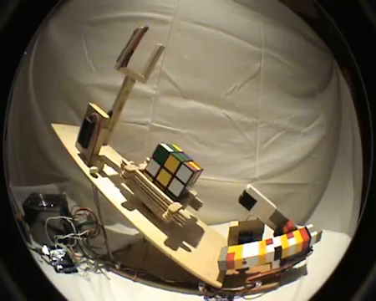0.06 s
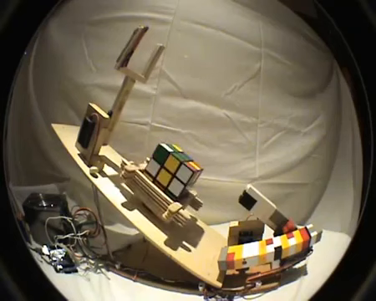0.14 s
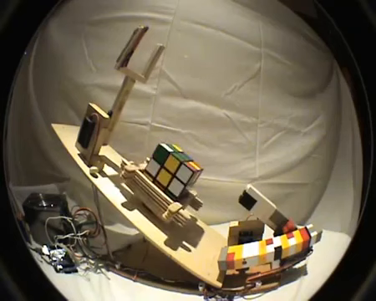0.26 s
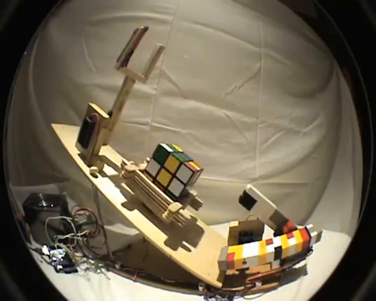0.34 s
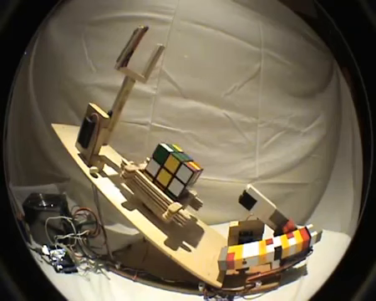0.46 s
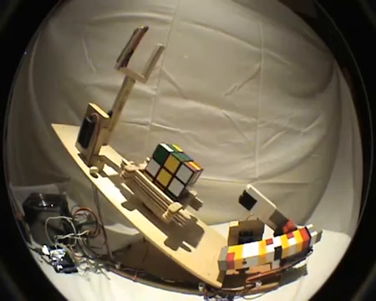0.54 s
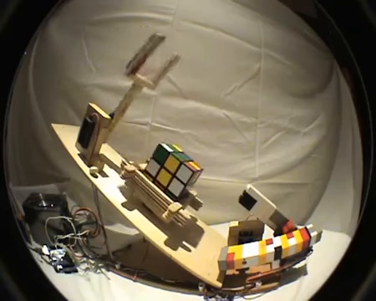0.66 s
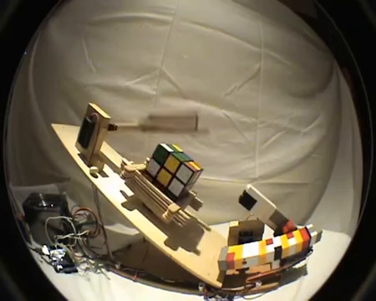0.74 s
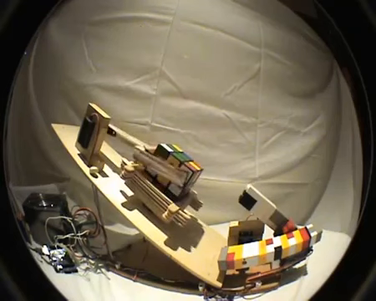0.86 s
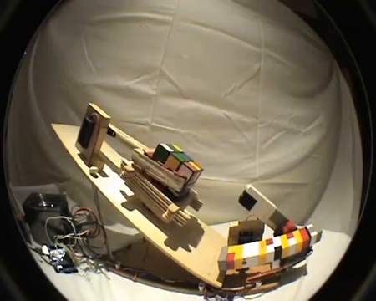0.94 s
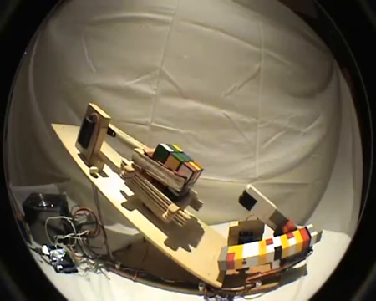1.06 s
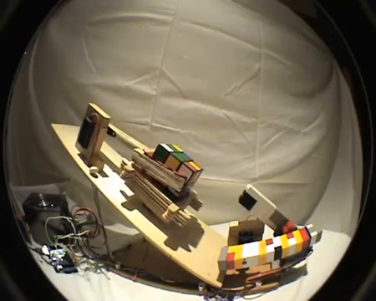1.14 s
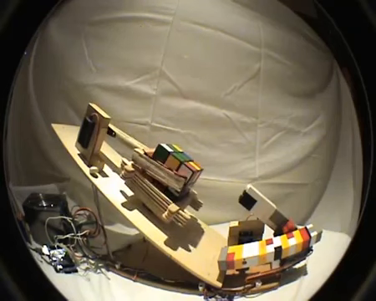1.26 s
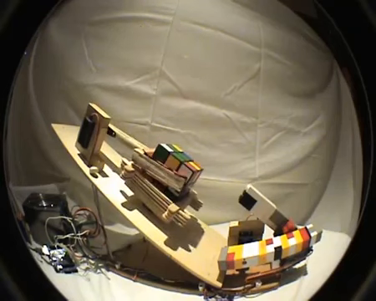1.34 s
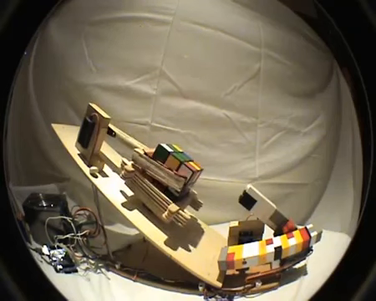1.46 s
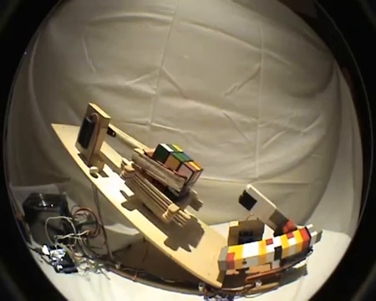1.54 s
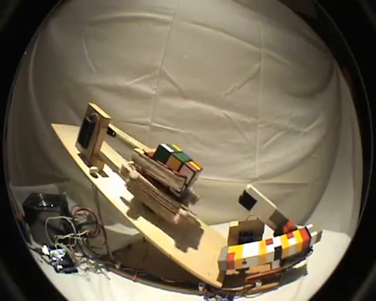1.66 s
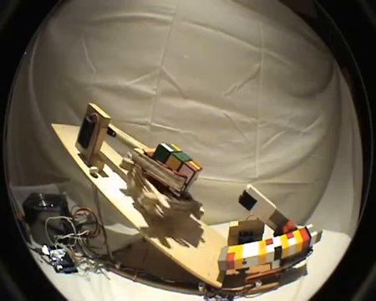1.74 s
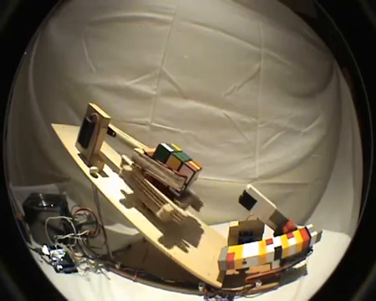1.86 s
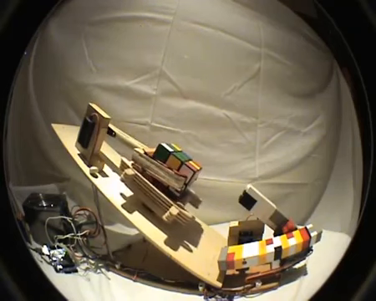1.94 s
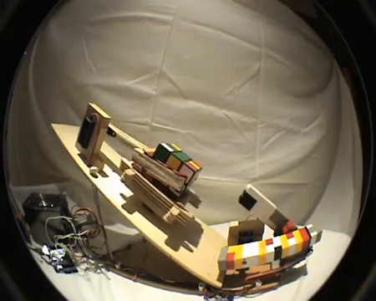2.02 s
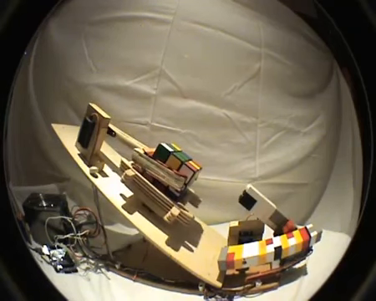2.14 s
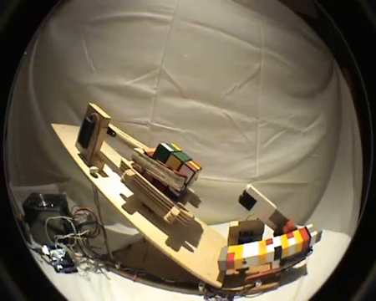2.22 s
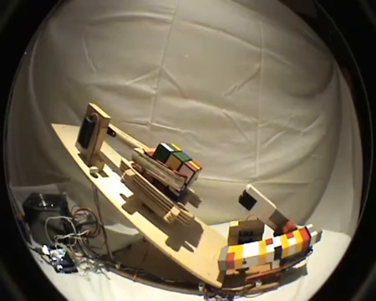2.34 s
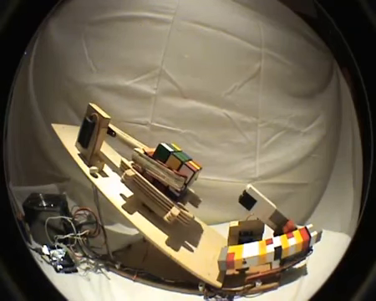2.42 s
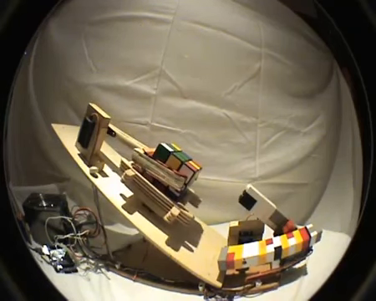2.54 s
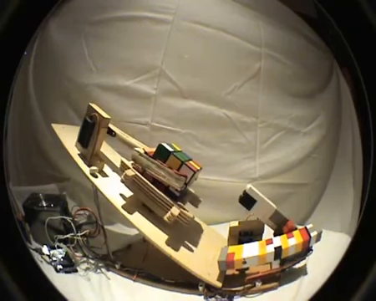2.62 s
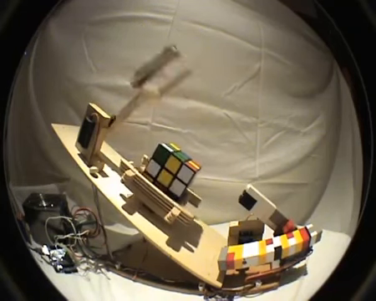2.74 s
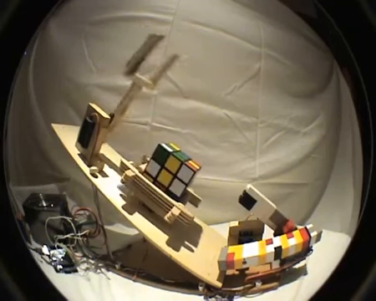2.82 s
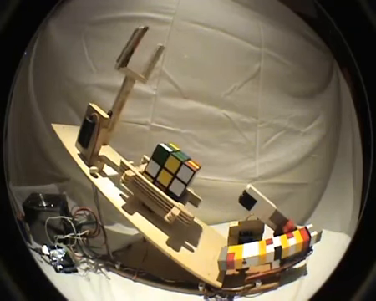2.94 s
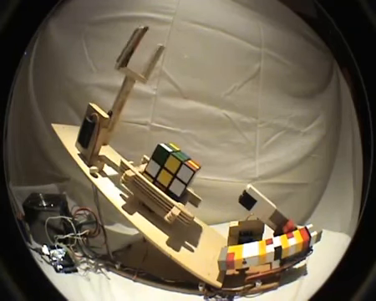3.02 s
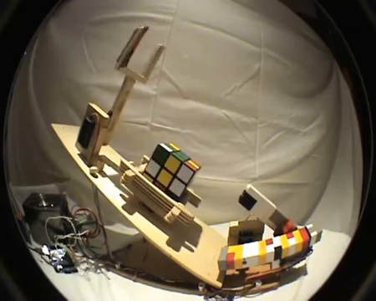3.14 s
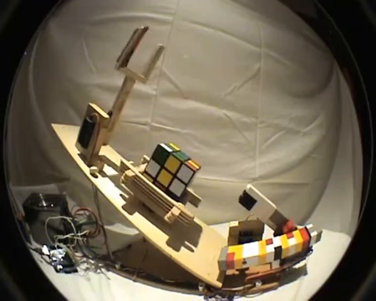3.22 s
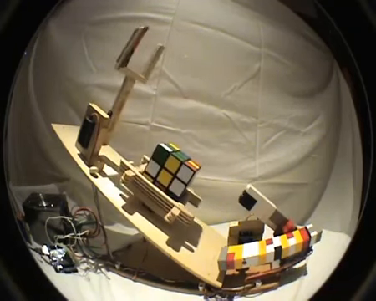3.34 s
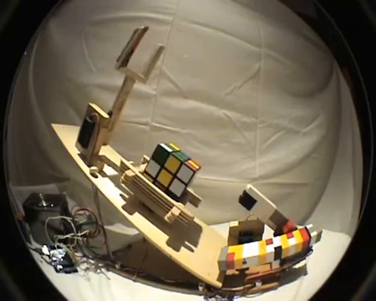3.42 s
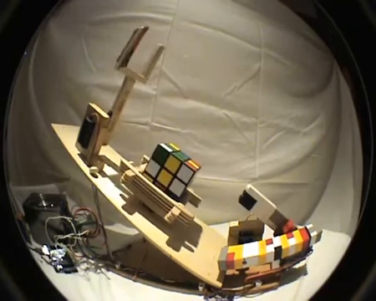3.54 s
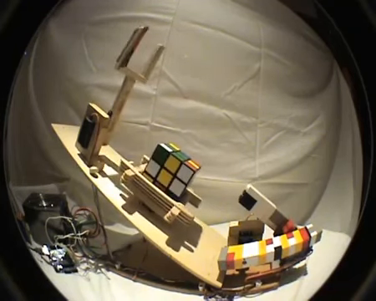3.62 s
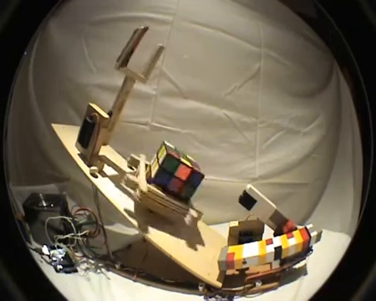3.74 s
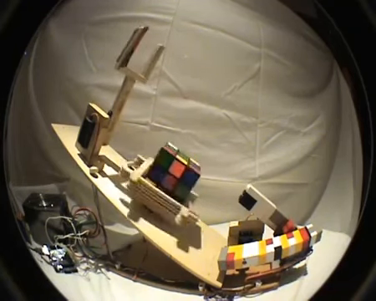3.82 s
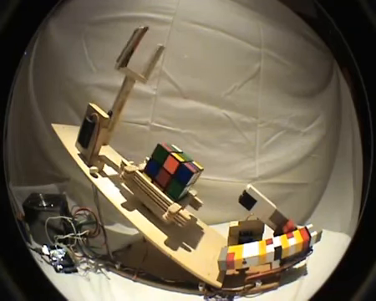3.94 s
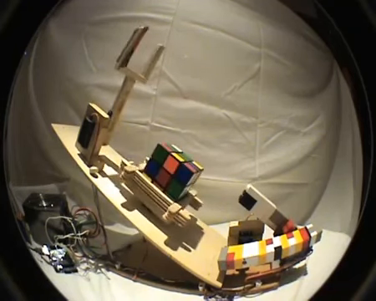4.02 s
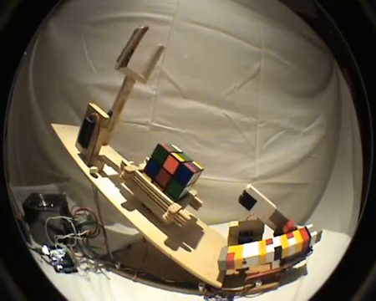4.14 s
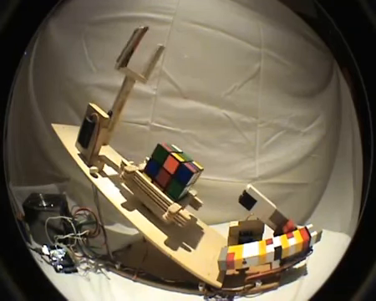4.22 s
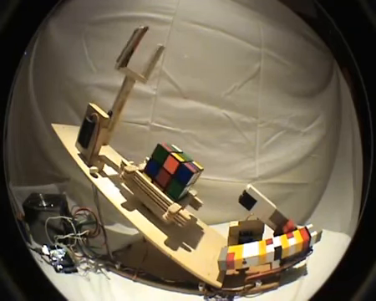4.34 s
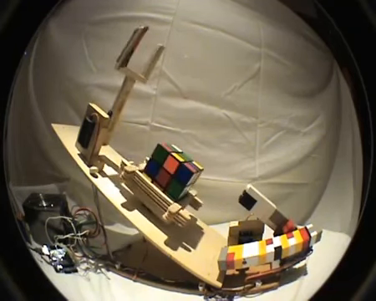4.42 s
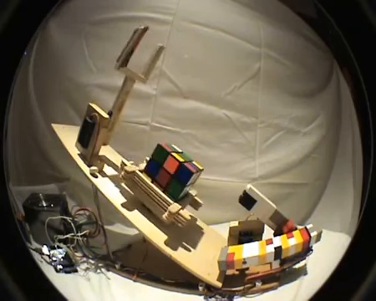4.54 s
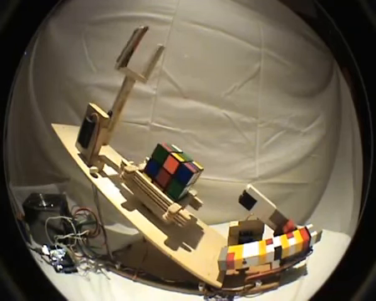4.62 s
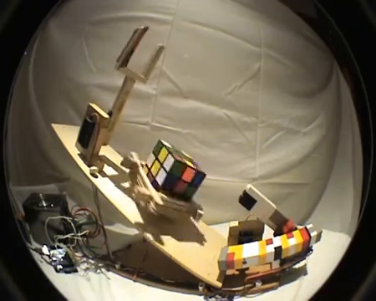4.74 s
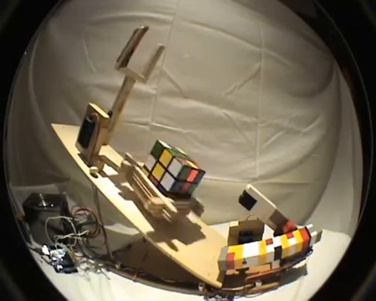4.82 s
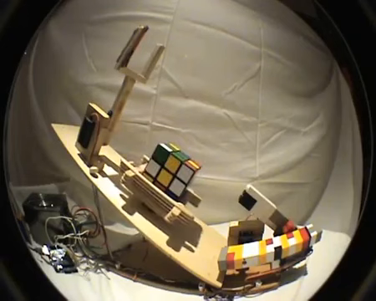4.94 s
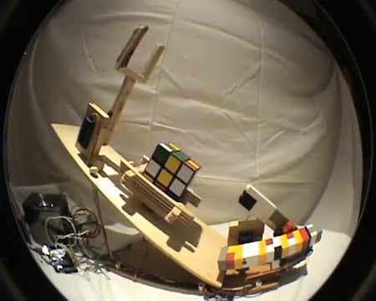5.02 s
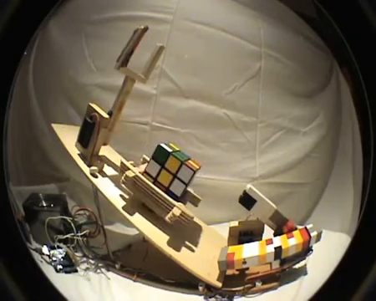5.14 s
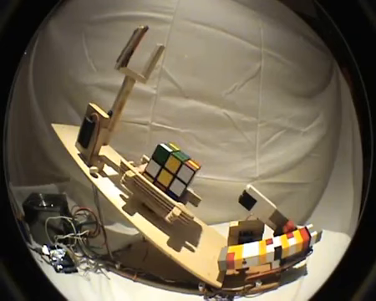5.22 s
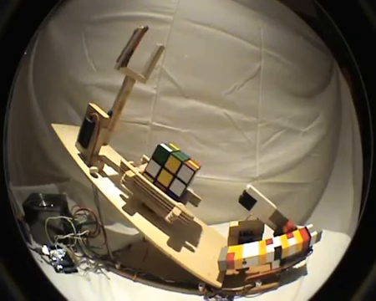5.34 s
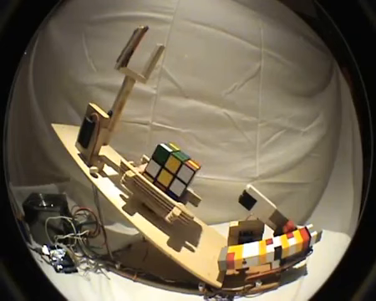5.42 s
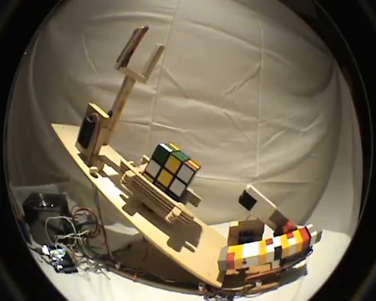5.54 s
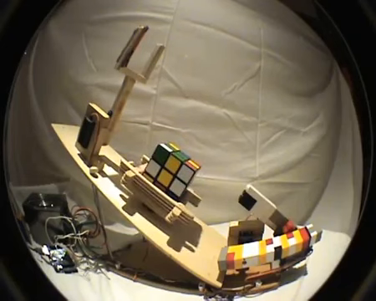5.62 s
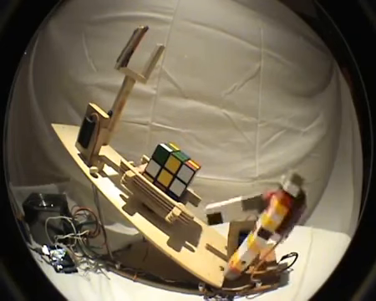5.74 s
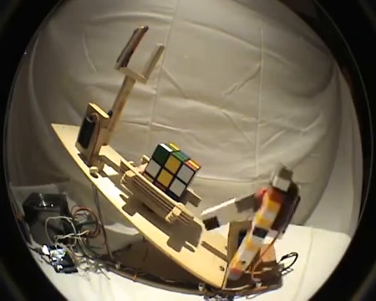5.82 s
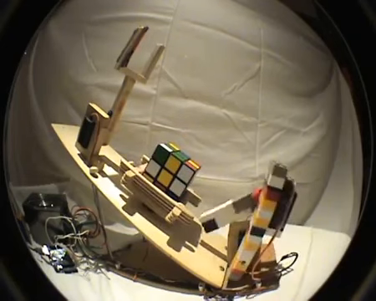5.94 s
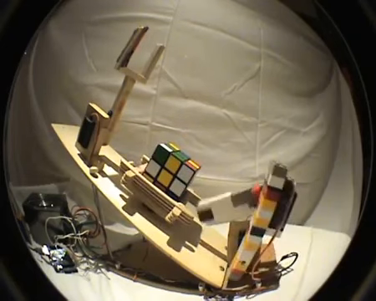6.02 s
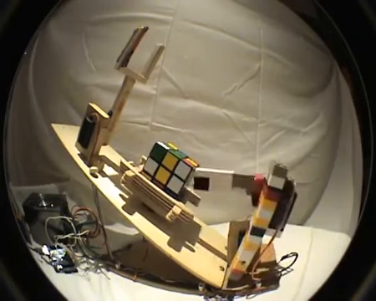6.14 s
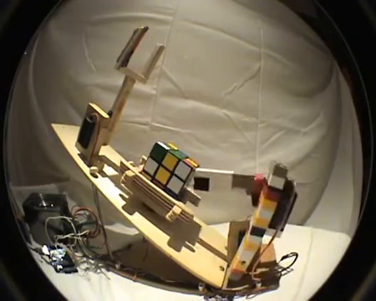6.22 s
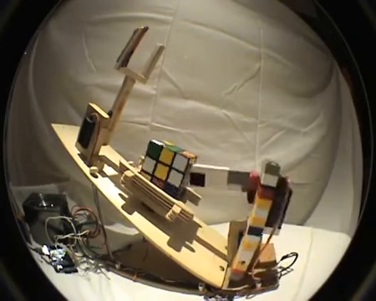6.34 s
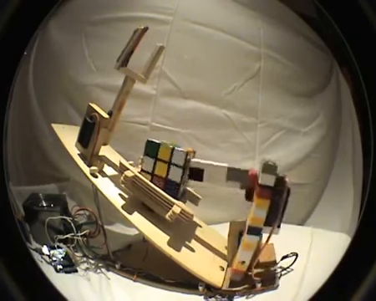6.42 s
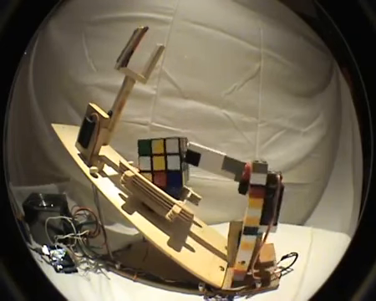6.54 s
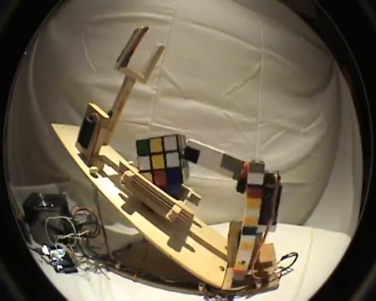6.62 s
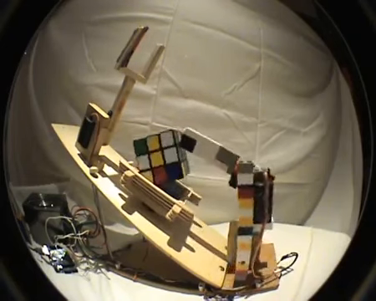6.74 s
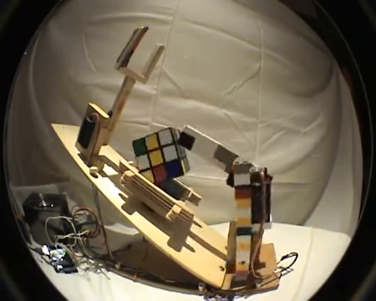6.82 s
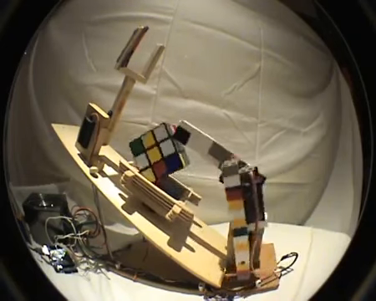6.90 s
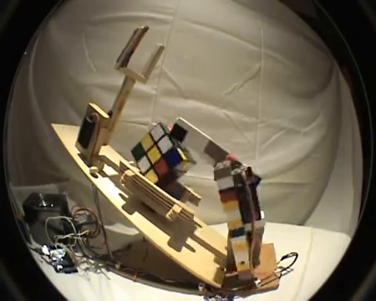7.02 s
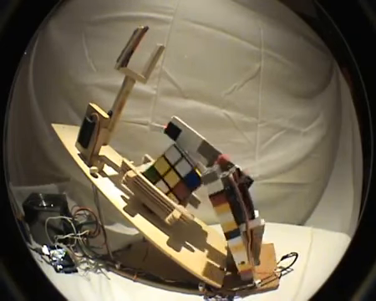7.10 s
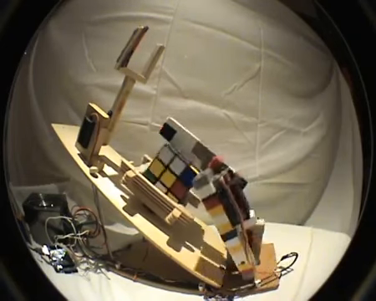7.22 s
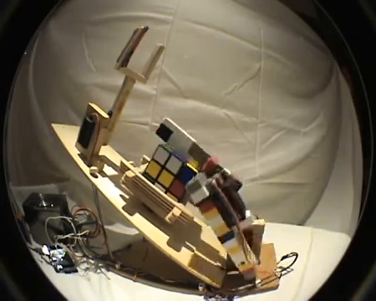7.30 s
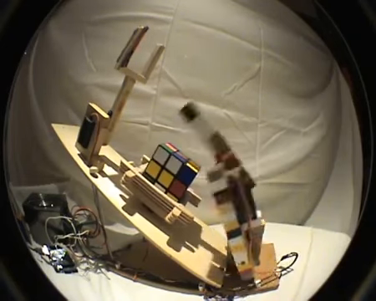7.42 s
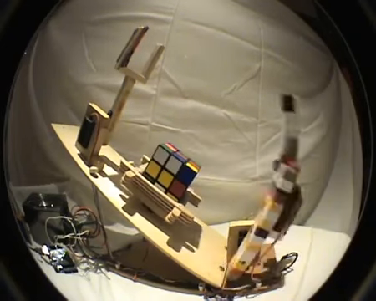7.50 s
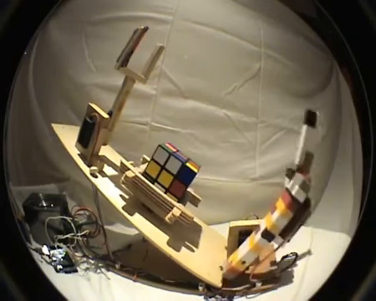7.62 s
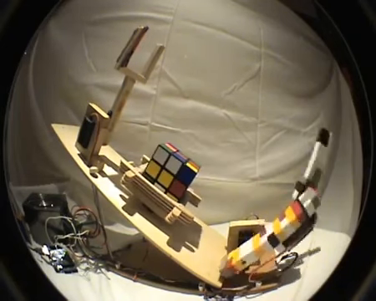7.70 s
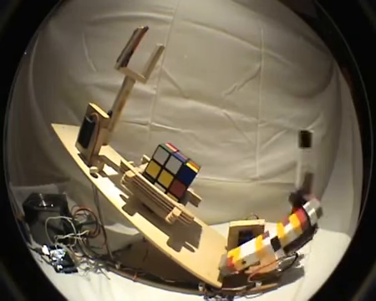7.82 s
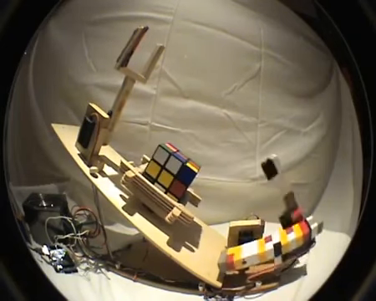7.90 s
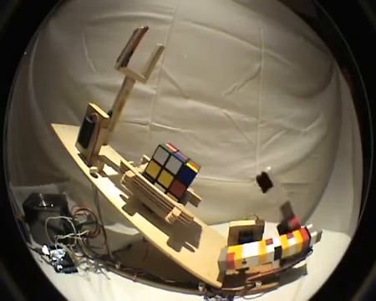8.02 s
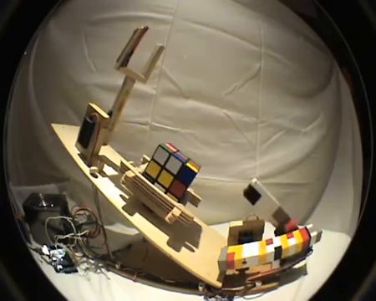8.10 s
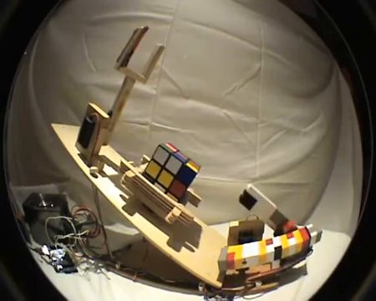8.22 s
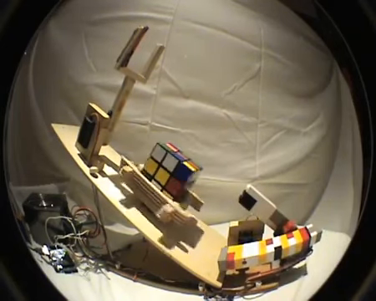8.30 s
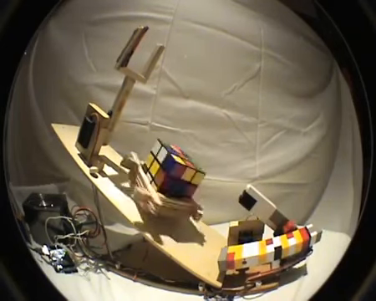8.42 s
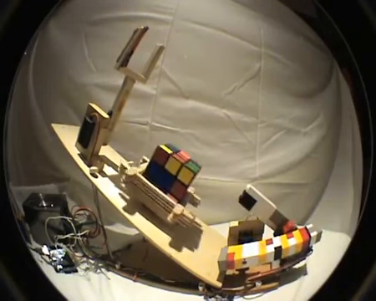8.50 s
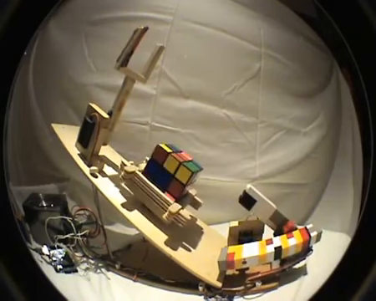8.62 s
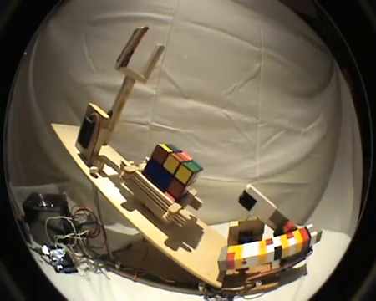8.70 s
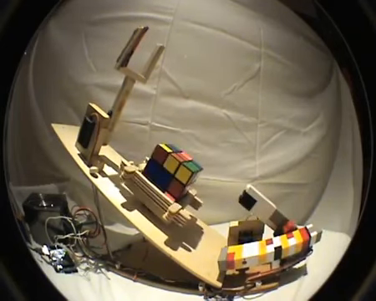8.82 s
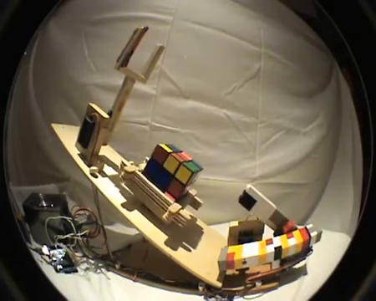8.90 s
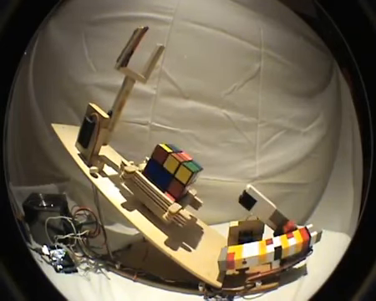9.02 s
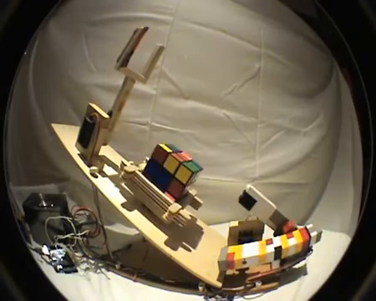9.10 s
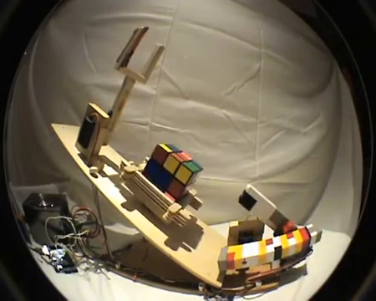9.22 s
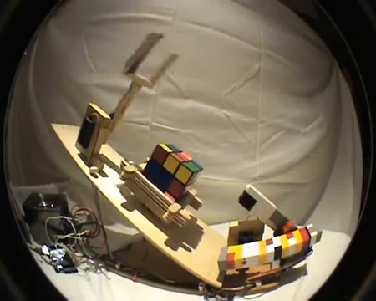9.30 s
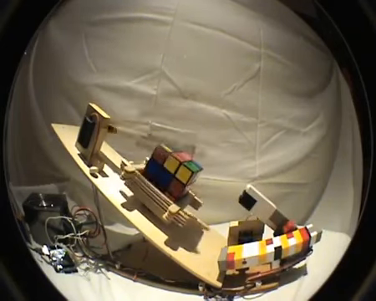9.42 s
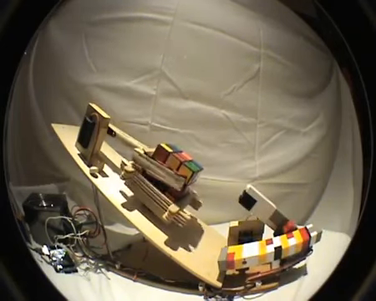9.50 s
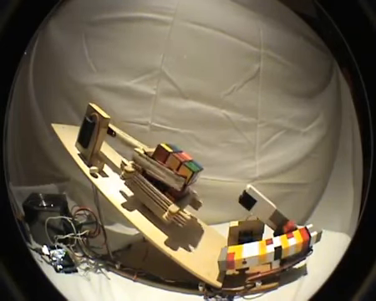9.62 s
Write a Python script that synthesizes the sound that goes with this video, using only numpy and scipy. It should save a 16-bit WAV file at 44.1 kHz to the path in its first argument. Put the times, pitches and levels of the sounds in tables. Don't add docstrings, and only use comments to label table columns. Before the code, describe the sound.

Close, dry servo motors whirr in short bursts, clicking and turning a plastic puzzle cube on a wooden board, over a steady soft fan hum.

```python
import sys
import numpy as np
from scipy import signal
from scipy.fft import rfft, irfft, next_fast_len
from scipy.io import wavfile
from scipy.ndimage import uniform_filter1d

SR = 44100
rng = np.random.default_rng(int(sys.argv[2]) if len(sys.argv) > 2 else 0)


def gain_from_db(level_db):
    decades = np.asarray(level_db, float) / 20
    return 10 ** decades


def wav_record(signal):
    frames = np.transpose(np.atleast_2d(signal))
    bounded = np.clip(frames, -1, 1)
    quanta = np.round(bounded * 32767).astype(np.int16)
    wavfile.write(sys.argv[1], SR, quanta)


N = 426006

TREBLE_FOLLOWS, BOARD_FOLLOWS = 1.67, 0.83


def rms_one(x):
    return x / np.sqrt(np.mean(x ** 2) + 1e-20)


def at_hz(points, hz):
    table_hz, values = np.transpose(points)
    return np.interp(np.log(hz + 1), np.log(table_hz), values)


def colour(x, points):
    length = x.shape[-1]
    size = next_fast_len(length)
    gain = gain_from_db(at_hz(points, np.fft.rfftfreq(size, 1 / SR)))
    return irfft(rfft(x, size) * gain, size)[..., :length]


def filtered(x, order, hz, kind):
    return signal.sosfilt(signal.butter(order, hz, kind, fs=SR, output="sos"), x)


def drift(rate_hz, size):
    knots = rng.standard_normal(4000)
    return np.interp(np.arange(size) * rate_hz / SR, np.arange(len(knots)), knots) * np.sqrt(3 / 2)


def resonance(x, hz, width_hz):
    r = np.exp(-np.pi * max(width_hz, 3) / SR)
    poles = [1, -2 * r * np.cos(2 * np.pi * hz / SR), r * r]
    return signal.lfilter([(1 - r * r) / 2, 0, (r * r - 1) / 2], poles, x)


def wobbling_sine(hz, wander_hz, rate_hz, size):
    cycles = np.cumsum(hz + wander_hz * drift(rate_hz, size)) / SR
    return np.sqrt(2) * np.sin(2 * np.pi * cycles)


def past(t, knee_s):
    return knee_s * np.logaddexp(0, t / knee_s)


def evened(x):
    return x / np.sqrt(uniform_filter1d(x ** 2, size=round(0.05 * SR)) + 1e-12)


def balanced(pan_db):
    return gain_from_db(np.array([[pan_db / 2], [-pan_db / 2]]))


# resonance in Hz, width in Hz, level in dB.
BOARD = [(128, 53.6, 3), (284, 60, -8), (522, 30, 1), (870, 810, -14)]


def servo(moves, case, rings, whine_hz, spread_hz, whine_gain_db, pan_db, beat_hz, beat_db, grain_db, ring_db):
    out = np.zeros(N + 2 * SR)
    for s, gear_db, treble_db, board_db in moves:
        gear, treble, shaken = gain_from_db(gear_db), gain_from_db(treble_db), gain_from_db(board_db)
        start, size = SR + round(s * SR), len(gear)
        turns = np.cumsum(beat_hz * (1 + 0.032 * drift(13, size))) / SR
        kick = uniform_filter1d(np.exp(-3 * (turns % 1)), size=90)
        swell = gain_from_db(beat_db * (kick - 0.3) + 1.46 * drift(85, size) + 0.43 * drift(40, size))
        grains = gain_from_db(grain_db * np.minimum(rng.exponential(1, size), 4))
        teeth = rng.standard_normal(size) * grains * swell
        sung = np.zeros(size)
        for k, (hz, width, db) in enumerate(rings):
            shift_db = 7 * np.tanh(0.7 * drift(30, size))
            ring = rms_one(resonance(teeth, hz, width)) * np.sqrt(width)
            sung += (-1) ** k * gain_from_db(db + shift_db) * ring
        gears = rms_one(colour(teeth, case)) + gain_from_db(ring_db) * rms_one(sung)
        low = evened(filtered(gears, 4, 5200, "low"))
        high = evened(filtered(gears, 4, 5200, "high"))
        rough = filtered(teeth, 2, spread_hz, "low")
        whine = wobbling_sine(whine_hz, 0.015 * whine_hz, 13, size)
        whine = evened(whine * (0.5 + rms_one(rough)) * swell)
        shake = rng.standard_normal(size) * swell
        board = sum(gain_from_db(db + 7.4 * drift(15, size)) * resonance(shake, hz, 1.2 * width)
                    for hz, width, db in BOARD)
        rumble = colour(shake, [(60, -30), (200, -2.5), (1000, 0), (1800, -36)])
        board = evened(rms_one(board) + 1.75 * rms_one(rumble))
        move = gear * low + treble * high + shaken * board
        move += gain_from_db(whine_gain_db) * np.hypot(gear, treble) * whine
        out[start:start + size] += move * signal.windows.tukey(size, 300 / size)
    return out[SR:SR + N] * balanced(pan_db)


def powered(moves, spin_up_s, sag_db_per_s, coast_db_per_s, knee_s, board_db):
    t = np.arange(SR * 3 // 7) / SR
    start_loss_db = 21.5
    for s, length, gear_db, treble_db in moves:
        loss = start_loss_db * np.exp(-t / spin_up_s) + sag_db_per_s * t
        loss += coast_db_per_s * past(t - length, knee_s)
        treble = gear_db + treble_db - TREBLE_FOLLOWS * loss
        yield s, gear_db - loss, treble, gear_db + board_db - BOARD_FOLLOWS * loss


def creeping(efforts, treble_db, board_db, usual_db):
    for rows in efforts:
        s, db = np.transpose(rows)
        gear = np.interp(np.arange(s[0], s[-1], 1 / SR), s, db)
        board = usual_db + board_db + BOARD_FOLLOWS * (gear - usual_db)
        yield s[0], gear, gear + treble_db, board


# start in seconds, powered time in seconds, gear level in dB, treble above gear in dB.
TABLE_MOVES = [
    (-0.25, 0.21, -23, -8),
    (1.694, 0.26, -20.5, -0.5),
    (1.97, 0.066, -39.5, -11),
    (3.696, 0.25, -22, 1),
    (4.722, 0.26, -21, -0.5),
    (8.381, 0.25, -21.5, 0.5),
]
# frequency in Hz, level in dB per Hz.
TABLE_COLOUR = [(590, -33.5), (1000, -17.5), (1970, -22), (2310, -3), (3300, -9), (4340, -5), (6410, -13.5),
                (8840, -11.5), (14500, -23.5), (15500, -36.5)]
# frequency in Hz, width in Hz, level in dB.
TABLE_RINGS = [(1670, 190, -8), (2373, 65, 3.5), (3500, 60, -13), (5690, 160, -3), (6900, 180, -13.5),
               (7560, 140, -2), (8880, 370, -11)]


def table_servo():
    moves = powered(TABLE_MOVES, spin_up_s=0.011, sag_db_per_s=4, coast_db_per_s=286.5, knee_s=0.012,
                    board_db=-14.5)
    return servo(moves, TABLE_COLOUR, TABLE_RINGS, whine_hz=4370, spread_hz=110, whine_gain_db=-11,
                 pan_db=0.8, beat_hz=96.3, beat_db=3.5, grain_db=1, ring_db=0)


# start in seconds, powered time in seconds, gear level in dB, treble above gear in dB.
CLAMP_MOVES = [
    (0.6917, 0.27, -27, 2.5),
    (2.704, 0.25, -23.5, 0),
    (9.383, 0.18, -25, 0.5),
    (8.76, 0.1, -57.5, -15),
]
# frequency in Hz, level in dB per Hz.
CLAMP_COLOUR = [(590, -54), (1000, -16), (1840, -8.5), (2680, -6), (3010, -2), (3260, -1), (6870, -10.5),
                (8840, -7), (14500, -25), (15500, -14)]
# frequency in Hz, width in Hz, level in dB.
CLAMP_RINGS = [(2614, 60, 8.5), (4130, 43, 5), (5770, 150, -3), (6200, 80, -13.5), (7990, 140, -2.5),
               (8460, 90, 20)]


def clamp_servo():
    moves = powered(CLAMP_MOVES, spin_up_s=0.0089, sag_db_per_s=9.5, coast_db_per_s=407, knee_s=0.011,
                    board_db=-16)
    return servo(moves, CLAMP_COLOUR, CLAMP_RINGS, whine_hz=3314, spread_hz=170, whine_gain_db=-10.5,
                 pan_db=1.9, beat_hz=101.1, beat_db=6.5, grain_db=2.5, ring_db=-7.5)


# start in seconds, powered time in seconds, gear level in dB, treble above gear in dB.
SHOULDER_MOVES = [
    (5.704, 0.19, -28.5, 8.7),
    (5.88, 0.026, -38, 14),
    (7.453, 0.058, -27, 1),
    (7.51, 0.069, -24, 11.5),
    (7.575, 0.074, -26, 10.5),
]
# frequency in Hz, level in dB per Hz.
SHOULDER_COLOUR = [(590, -29.5), (1000, -21.5), (1920, -8), (2260, -14.5), (3960, -8), (4540, -12.5),
                   (7110, -4.5), (9250, -11), (10400, -10), (15500, -22)]
# frequency in Hz, width in Hz, level in dB.
SHOULDER_RINGS = [(1920, 37.7, -44), (4000, 50, -0.5), (5610, 110, -14), (8140, 62, 10), (10450, 460, -3)]


def shoulder_servo():
    moves = powered(SHOULDER_MOVES, spin_up_s=0.018, sag_db_per_s=-0.5, coast_db_per_s=330, knee_s=0.021,
                    board_db=-12.5)
    return servo(moves, SHOULDER_COLOUR, SHOULDER_RINGS, whine_hz=7210, spread_hz=250, whine_gain_db=-4.5,
                 pan_db=-0.1, beat_hz=170.3, beat_db=5, grain_db=-0.5, ring_db=-6)


# start in seconds, powered time in seconds, gear level in dB, treble above gear in dB.
ELBOW_MOVES = [
    (6.066, 0.13, -30.5, 4.9),
    (7.797, 0.23, -27, 5),
]
# frequency in Hz, level in dB per Hz.
ELBOW_COLOUR = [(590, -48), (1000, -25), (1620, -6), (2450, -11), (3040, -21), (3960, -16.5), (6260, -1),
                (7190, -9.5), (12500, -13.5), (15500, -23)]
# frequency in Hz, width in Hz, level in dB.
ELBOW_RINGS = [(2570, 1200, -7.5), (4160, 380, 0), (4990, 150, -11), (7460, 210, 1), (8950, 200, -9),
               (12600, 500, -8.5)]


def elbow_servo():
    moves = powered(ELBOW_MOVES, spin_up_s=0.01, sag_db_per_s=7.5, coast_db_per_s=420, knee_s=0.01,
                    board_db=-16)
    return servo(moves, ELBOW_COLOUR, ELBOW_RINGS, whine_hz=6160, spread_hz=260, whine_gain_db=-12.5,
                 pan_db=-1, beat_hz=97.8, beat_db=-4, grain_db=4, ring_db=-3)


# time in seconds, gear level in dB as the effort
ARM_CREEPS = [
    [(6.3, -61.5), (6.4, -50.5), (6.47, -42.5), (6.55, -39.5), (6.61, -47), (6.65, -43.5), (6.82, -42),
     (6.87, -45.5), (7.07, -44)],
    [(7.09, -49), (7.13, -43.5), (7.17, -43), (7.26, -39.5), (7.3, -49), (7.36, -45), (7.41, -45),
     (7.45, -72)],
    [(7.67, -38), (7.73, -40), (7.81, -38)],
    [(8.03, -39), (8.12, -36.5), (8.19, -45), (8.21, -38), (8.23, -54), (8.255, -40), (8.31, -51.5),
     (8.335, -44), (8.38, -73)],
]
# frequency in Hz, level in dB per Hz.
CREEP_COLOUR = [(590, -59), (1200, -9), (2260, -6), (2470, -4.5), (3370, -18.5), (4440, -6.5), (6050, -2.5),
                (6710, -1.5), (14100, -16), (15500, -30.5)]


def arm_creeping():
    creeps = creeping(ARM_CREEPS, treble_db=-1, board_db=-9, usual_db=-47)
    return servo(creeps, CREEP_COLOUR, ELBOW_RINGS, whine_hz=6100, spread_hz=210, whine_gain_db=-1.5,
                 pan_db=0.1, beat_hz=49.4, beat_db=9.5, grain_db=2.5, ring_db=-6.5)


# start in seconds, powered time in seconds, gear level in dB, treble above gear in dB.
ELBOW_JOLTS = [
    (7.066, 0.017, -29.5, -0.5),
    (7.157, 0.076, -29.5, -6),
    (7.29, 0.042, -33, -0.5),
    (7.39, 0.014, -32.5, -12),
]


def elbow_jolting():
    jolts = powered(ELBOW_JOLTS, spin_up_s=0.002, sag_db_per_s=15, coast_db_per_s=375.5, knee_s=0.0045,
                    board_db=-4)
    return servo(jolts, CREEP_COLOUR, ELBOW_RINGS, whine_hz=5540, spread_hz=400, whine_gain_db=-5,
                 pan_db=2, beat_hz=85.2, beat_db=15, grain_db=2, ring_db=-3)


# start in seconds, cruise in seconds, top pitch in Hz, level in dB,
# second gear stage in dB.
SPINS = [(1.692, .2, 2228, -24.5, -18), (3.7, 0.17, 2404, -29.5, -1.5), (4.725, 0.2, 2395, -30.5, -9),
         (5.719, .13, 1997, -35.5, -11), (7.8, 0.15, 2540, -42.5, -1), (8.385, 0.17, 2424, -35.5, 3.5)]
# multiple of the pinion pitch, level in dB.
MESH_ORDERS = [(1, -3), (2, 2.5), (4, -6)]
# resonance in Hz, width in Hz, level in dB.
MESH_BODY = [(493, 57, 0), (1600, 69, -5.5), (2367, 340, 1), (3400, 120, -3.5), (4254, 330, 5.5),
             (8700, 900, -3)]


def mesh():
    start_hz, rise_s, brake_hz_per_s, brake_s = 1006, 0.04, 15000, 0.088
    stage_ratio, stage_fade_db_per_s = 0.286, 68
    out, size = np.zeros(N), SR // 2
    t = np.arange(size) / SR
    for s, cruise, top_hz, level_db, stage_db in SPINS:
        hz = top_hz - (top_hz - start_hz) * np.exp(-t / rise_s) - brake_hz_per_s * past(t - cruise, 0.01)
        cycles = np.cumsum(np.maximum(hz, 0) * (1 + 0.013 * drift(120, size))) / SR
        tones = np.zeros(size)
        for order, db in [*MESH_ORDERS, (stage_ratio, stage_db + 5.5 - stage_fade_db_per_s * t)]:
            flutter_db = 2.2 * drift(45, size) + 4.35 * drift(150, size)
            tones += gain_from_db(db + flutter_db) * np.sin(2 * np.pi * order * cycles)
        stop = cruise + brake_s
        running = np.interp(t, [0, 0.03, stop - 0.03, stop], [0, 1, 1, 0])
        out[round(s * SR):][:size] += tones * gain_from_db(level_db) * running
    body = sum((-1) ** k * gain_from_db(db) * resonance(out + 1e-18, hz, width)
               for k, (hz, width, db) in enumerate(MESH_BODY))
    return body * balanced(1)


def knocks(events, crack_db, crack, crack_s, ring_db, cycles):
    out, t = np.zeros(N + SR), np.arange(SR // 4) / SR
    for s, peak_db, hz in events:
        noise = rng.standard_normal(len(t))
        broad = rms_one(colour(noise, [(share * hz, db) for share, db in crack]))
        broad = rms_one(colour(broad, [(9000, -5), (15000, -12)]))
        snap = rms_one(broad + 0.5 * rms_one(resonance(broad, hz, 0.41 * hz))) * np.exp(-t / crack_s)
        modes = np.sin(2 * np.pi * hz * t) + 0.4 * np.sin(2 * np.pi * 1.05 * hz * t)
        ringing = modes * gain_from_db(-60 * t * np.sqrt(hz) / cycles)
        out[round(s * SR):][:len(t)] += gain_from_db(peak_db) * (gain_from_db(crack_db) * snap + gain_from_db(ring_db) * ringing)
    return out[:N]


# time in seconds, peak in dB, pitch in Hz.
CUBE_CLICKS = [(0.748, -11.5, 4130), (0.7766, -6.5, 4100), (0.8155, -5.5, 8050), (1.019, -25.5, 3120),
               (1.0545, -42, 5960), (2.032, -30, 7000), (2.0877, -29.5, 6100), (2.1464, -28.5, 6800),
               (5.7369, -20, 6970), (7.1853, -9, 2880), (7.225, -1.5, 7200), (7.4949, -6, 7850)]
# time in seconds, peak in dB.
ARM_TICKS = [(6.3131, -39), (6.3949, -27), (6.4743, -19), (6.564, -21), (6.6536, -17.5), (6.737, -24),
             (6.7958, -17), (6.836, -17), (7.1627, -11), (7.294, -19), (7.398, -14), (8.0457, -12),
             (8.078, -10), (8.1192, -14), (8.1503, -19.5), (8.2017, -18), (8.3345, -16.5)]


def clicks():
    events = [*CUBE_CLICKS, *[(s, db, 5840) for s, db in ARM_TICKS]]
    return knocks(events, crack_db=-11, crack=[(0.15, -6), (0.4, 4.5), (1.1, 5.5), (2.2, 3.5), (5, -25)],
                  crack_s=0.005, ring_db=-11, cycles=1.75)


# time in seconds, peak in dB, pitch in Hz.
THUDS = [(6.177, -21, 522), (6.41, -27.5, 495), (6.547, -28.5, 148), (6.795, -22, 477), (6.818, -26, 289),
         (7.071, -29.5, 115), (7.176, -22, 183), (7.219, -27.5, 79.5), (7.317, -28, 378), (7.342, -18, 384),
         (7.393, -23, 135), (7.927, -25.5, 251), (8.325, -26.5, 384)]


def thuds():
    return knocks(THUDS, crack_db=-12, crack=[(0.15, 2), (0.5, 5), (2.5, -11), (8, -30)],
                  crack_s=0.033, ring_db=-11.5, cycles=2.8)


# time in seconds, peak in dB.
SETTLING = [(0.0512, -23.5), (0.125, -35), (2.0765, -27), (2.0973, -19.5), (2.116, -22), (2.136, -17.5),
            (2.162, -27), (4.0372, -25), (4.083, -42), (5.0998, -25), (6.5504, -17.5), (6.789, -19),
            (6.823, -18.5), (7.071, -19), (7.0833, -24), (8.382, -15), (8.7011, -23), (9.6326, -29)]


def settling():
    crack = [(0.3, -14), (0.7, 2), (1.05, -2), (1.5, -8), (2.3, 0.5), (4, -15)]
    return knocks([(s, db, 2447) for s, db in SETTLING], crack_db=-14.5, crack=crack,
                  crack_s=0.0045, ring_db=-12, cycles=1.2)


# frequency in Hz, time to fall 60 dB in seconds.
ROOM = [(200, 0.46), (2000, 0.071), (8000, 0.057), (15000, 0.16)]
# frequency in Hz, level in dB.
ROOM_COLOUR = [(60, -8.5), (300, 0), (1000, 7), (4000, 9.5), (8000, 4), (13000, -21)]


def room(x):
    t, tail = np.arange(SR // 2) / SR, 0
    white = rng.standard_normal((2, len(t)))
    for low in 100 * 2.0 ** np.arange(8):
        band = filtered(white, 2, [low, min(low * 2, 0.45 * SR)], "band")
        t60_s = max(at_hz(ROOM, low * np.sqrt(2)), 0.03)
        tail = tail + band * gain_from_db(-60 * t / t60_s)
    tail = np.pad(tail / np.sqrt(np.sum(tail ** 2) / 2), ((0, 0), (40, 0)))
    return signal.fftconvolve(colour(x, ROOM_COLOUR)[None], tail, axes=1)[:, :N]


# frequency in Hz, level in dB per Hz.
FAN = [(15, -30), (25, -9), (48, -10.5), (64, -12.5), (96, -8.5), (122, -21), (156, -9), (313, -9.5),
       (540, -9), (690, -4.5), (820, -9), (1900, -20.5), (2500, -25.5), (6210, -32), (14300, -37.5),
       (15500, -49.5)]
# pitch in Hz, wander in Hz, level in dB rms.
FAN_HUMS = [(94.3, 4.5, -68), (168.5, 0.52, -63), (196.6, 0.14, -61.5), (684, 1.5, -58)]
# frequency in Hz, left-right likeness from -1 to 1.
LIKENESS = [(60, 0.99), (180, 0.91), (550, 0.66), (1650, 0.24), (4970, 0.14), (15000, 0.68)]


def fan():
    mid, side = colour(rng.standard_normal((2, N)), FAN)
    mid = colour(mid, [(hz, 10 * np.log10(1 + c)) for hz, c in LIKENESS])
    side = colour(side, [(hz, 10 * np.log10(max(1 - c, 0.01))) for hz, c in LIKENESS])
    air = gain_from_db(-49.5 + 0.11 * drift(1.7, N)) * rms_one(np.array([mid + side, mid - side]))
    hums = sum(gain_from_db(db + 1.5 * drift(5.9, N)) * wobbling_sine(hz, wander, 6, N)
               for hz, wander, db in FAN_HUMS)
    return air + hums * balanced(0.8)


def scene():
    robot = table_servo() + clamp_servo() + shoulder_servo()
    robot += elbow_servo() + arm_creeping() + elbow_jolting()
    robot += mesh()
    robot += clicks() + thuds() + settling()
    return gain_from_db(-1.36) * robot + gain_from_db(-12.5) * room(robot.mean(axis=0)) + fan()


def roll_off(x):
    return signal.sosfilt(signal.butter(12, 16320, fs=SR, output="sos"), x)


def record(dry):
    heard = signal.sosfilt(signal.cheby2(14, 60, 15650, fs=SR, output="sos"), dry)
    return roll_off(heard)


dry = scene()
out = record(dry)
wav_record(out)
```